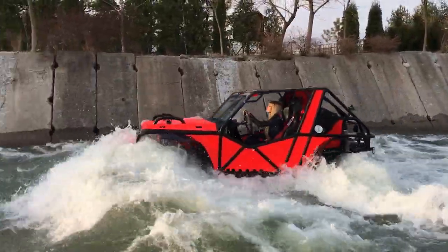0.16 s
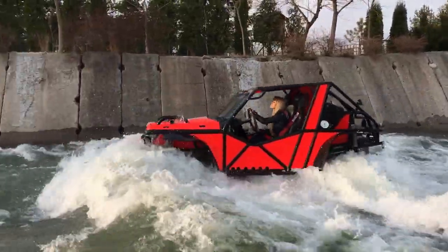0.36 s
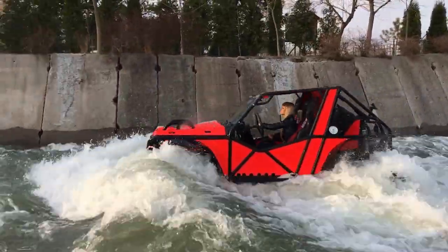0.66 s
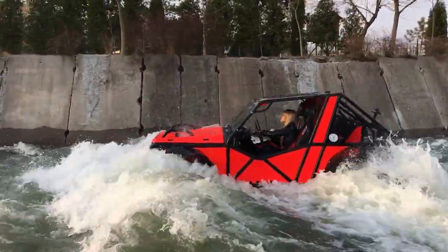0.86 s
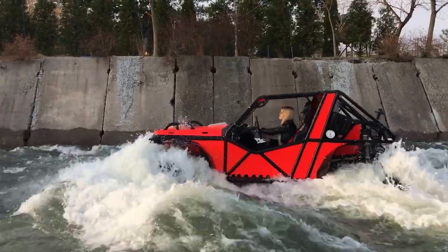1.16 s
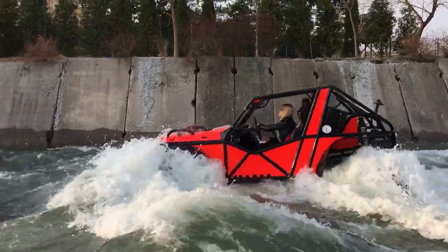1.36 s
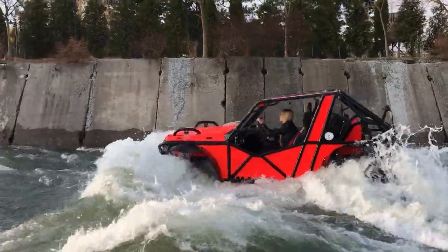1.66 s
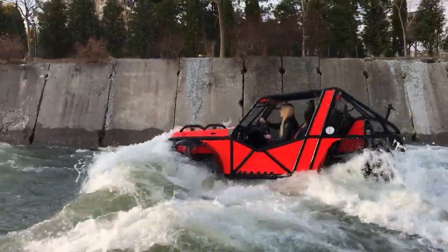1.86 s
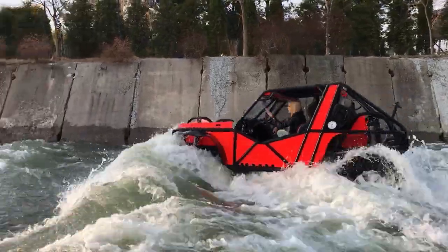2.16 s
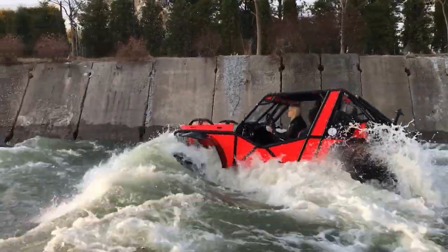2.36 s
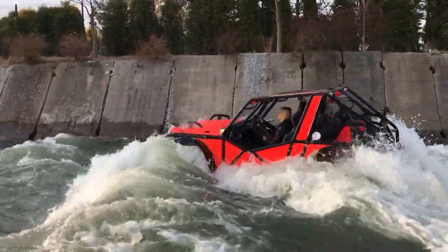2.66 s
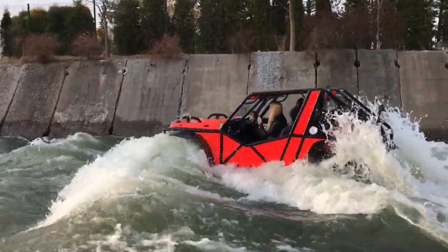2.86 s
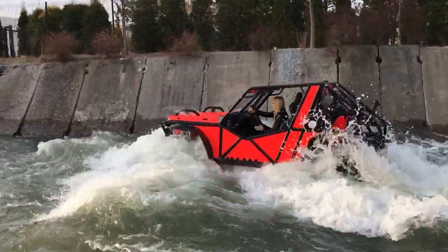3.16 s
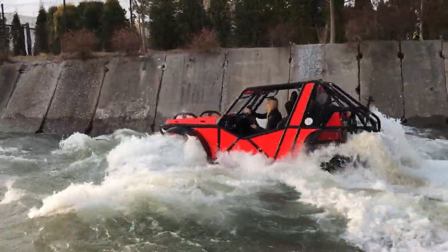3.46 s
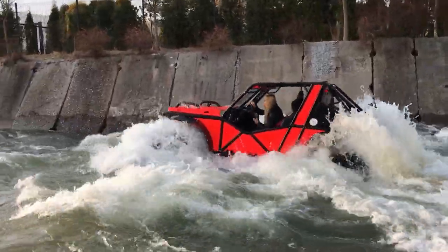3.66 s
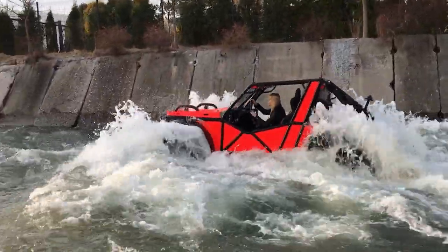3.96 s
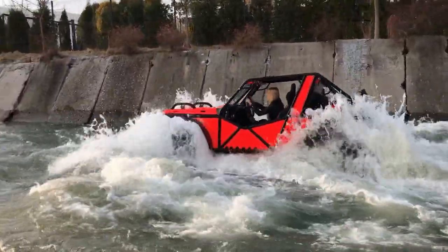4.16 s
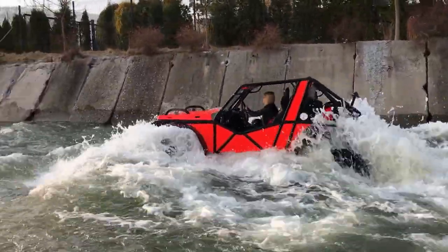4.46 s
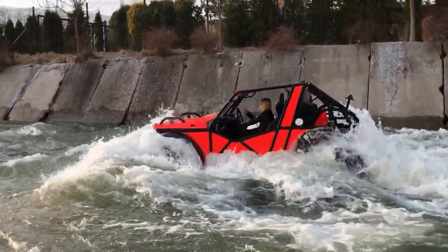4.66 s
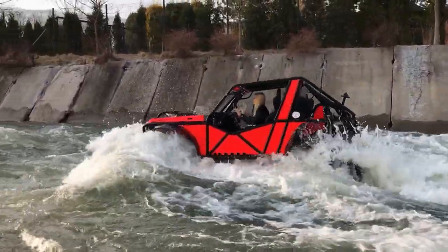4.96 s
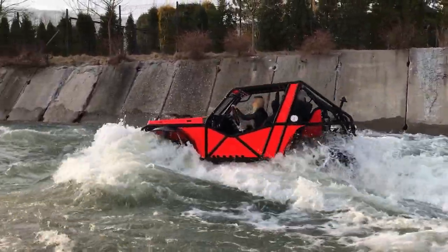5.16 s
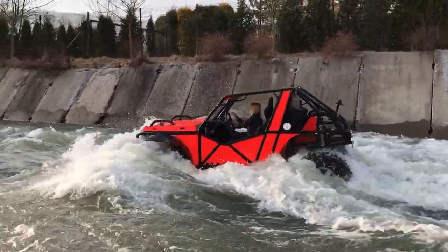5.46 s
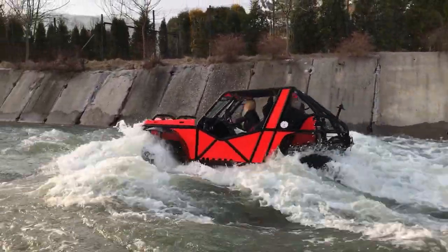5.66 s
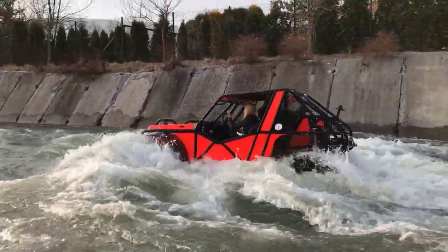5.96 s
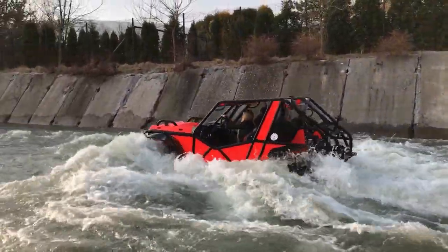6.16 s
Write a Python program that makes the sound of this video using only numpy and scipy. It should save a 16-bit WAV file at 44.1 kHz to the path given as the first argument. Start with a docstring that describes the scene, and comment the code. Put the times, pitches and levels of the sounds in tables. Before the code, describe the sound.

A V8 off-road buggy sits in fast, churning water, its lumpy exhaust burbling low. It revs early, again just after two seconds, and hardest between three and four, then falls back to a throbbing tick-over near five. Continuous river rush with fizzing droplets and bubbles surrounds it, and quick splashes slap nearby. Heard outdoors from the bank through a phone-like microphone with thin deep bass.

```python
"""A cross-plane V8 buggy revs beside a river rushing down a concrete channel, heard from the bank.
From the start the engine ticks over, its uneven exhaust bank made of cycle orders (cosines at multiples of the
cycle rate) and pulsed noise; the river is bands of noise with droplets and ringing bubbles.
The engine surges at about 0.4 s, 2 s and, highest, 3 to 4 s, then sinks to tick-over near 5 s.
From 0.6 s a few nearer splashes slap, each a short rising tone with a burst of noise."""
import sys
import numpy as np
from scipy import signal
from scipy.io import wavfile
from scipy.ndimage import uniform_filter1d

SR = 44100
rng = np.random.default_rng(int(sys.argv[2]) if len(sys.argv) > 2 else 0)


def materialize(psi):
    """Save the field psi as 16-bit PCM at rate SR to the path in sys.argv[1].

    A 1-D psi becomes a single channel; in a 2-D psi each row is a channel.
    """
    bounded = np.clip(np.atleast_2d(psi).T, -1, 1)
    quanta = np.round(bounded * 32767).astype(np.int16)
    wavfile.write(sys.argv[1], SR, quanta)


N = 278712
T = np.arange(N) / SR  # time in s


def undb(db):
    """Turn decibels into gain."""
    return 10 ** (np.asarray(db) / 20)


def unit(x):
    """Scale to rms 1."""
    return x / np.sqrt(np.mean(x ** 2))


def curves(table):
    """Join each column of a table by straight lines in time."""
    s, *columns = np.transpose(table)
    return [np.interp(T, s, c) for c in columns]


def colour_db(points, hz):
    """Read a spectrum's level, with pitch on a log scale."""
    f, db = np.transpose(points)
    return np.interp(np.log(hz), np.log(f), db)


def band(x, hz, width):
    """Two-pole resonance, gain 1 at the centre."""
    b, a = signal.iirpeak(min(hz, .45 * SR), hz / width, fs=SR)
    return signal.lfilter(b, a, x)


def walk(rate):
    """Random levels held 1 / rate seconds, then smoothed twice into a slow wander; spread near 1."""
    k = int(SR / rate)
    steps = np.repeat(rng.standard_normal(N // k + 1), k)
    return 1.11 * uniform_filter1d(uniform_filter1d(steps, k), k)[:N]


# How fast the engine turns; one cycle is two crank turns: start_s, cycle_rate_hz
SPEED = [(0, 15.0), (.16, 15.1), (.32, 14.1), (.4, 14.85), (.64, 21.07), (.72, 22.0), (.84, 22.45),
         (.96, 21.8), (1.12, 18.94), (1.2, 18.0), (1.36, 16.65), (1.56, 15.95), (1.84, 15.45), (2.0, 15.95),
         (2.08, 15.87), (2.4, 23.46), (2.56, 23.85), (2.72, 22.7), (2.8, 21.2), (3.04, 18.63),
         (3.12, 19.24), (3.44, 25.54), (3.6, 26.8), (3.68, 26.97), (3.84, 29.44), (3.95, 29.75),
         (4.08, 28.33), (4.16, 23.7), (4.27, 21.3), (4.4, 20.82), (4.56, 21.2), (4.72, 21.28), (4.81, 20.0),
         (4.95, 14.5), (5.04, 15.75), (5.14, 15.75), (5.28, 16.6), (5.44, 16.48), (5.7, 15.42),
         (5.77, 15.55), (5.86, 16.55), (6.16, 15.35), (6.32, 15.3)]


def turning():
    """Cycles turned so far, and how hard the engine pulls, from how fast its speed rises."""
    full_pull_hz_per_s, smoothing_s = 33.2, 0.078
    hz, = curves(SPEED)
    rise = uniform_filter1d(np.gradient(hz) * SR, int(smoothing_s * SR))
    return hz, np.cumsum(hz) / SR, np.clip(rise / full_pull_hz_per_s, -.5, 1)


def firing_strength(cycle):
    """A random strength for each of the 8 firings in a cycle, sliding from one to the next."""
    chance = rng.standard_normal(N // 100)
    return np.interp(8 * cycle, np.arange(len(chance)), chance)


# The uneven firing pattern of one exhaust bank: firing_slot (of 8), strength (relative)
BANK = [(0, 1), (3, .8), (5, .9), (6, .7)]


def order(k, cycle):
    """A cosine k times per cycle, its phase set by the bank's firing pattern."""
    slots, sizes = np.transpose(BANK)
    lead = np.angle(sizes @ np.exp(-2j * np.pi * k * slots / 8))
    lag = np.radians(90)  # a quarter-cycle phase lag on every order, which shapes the exhaust pulses
    return np.sqrt(2) * np.cos(2 * np.pi * k * cycle + lead - lag)


# Orders beside the drone and firing tone: the thump under load and two overtones of the lope:
# start_s, order_3_level_db, order_10_level_db, order_13_level_db
SIDE_ORDERS = [(0, -49, -28, -44), (.22, -46, -31.5, -40), (.33, -40, -28, -29), (.41, -26, -23, -30),
               (.56, -20, -23.5, -25), (.66, -22, -25.5, -32), (.88, -27, -42, -33.5), (.97, -47, -41, -46),
               (1.12, -38, -29, -50), (1.32, -44, -28.5, -27), (1.5, -41, -33, -34.5),
               (1.7, -48, -30, -37.5), (2.06, -36, -26, -28), (2.17, -23, -27.5, -30.5),
               (2.33, -20, -25, -28.5), (2.5, -25, -25, -42), (2.66, -23, -23, -52),
               (2.78, -46, -33.5, -48), (2.88, -26, -34, -39), (2.96, -36, -35, -54),
               (3.06, -29, -25.5, -37.5), (3.2, -27, -32, -25.5), (3.29, -24, -32, -35),
               (3.37, -21, -55, -56), (3.56, -23.5, -48, -30.5), (3.7, -24.5, -34, -46),
               (3.85, -20, -52, -35.5), (3.92, -38, -53, -53), (4.0, -26.5, -57, -51),
               (4.17, -22, -50, -41), (4.3, -28, -50, -40), (4.5, -39, -33, -52), (4.68, -30, -37, -41),
               (4.8, -44, -27.5, -42), (4.88, -21.5, -38, -52), (4.97, -40, -33, -45),
               (5.2, -37, -40.5, -47), (5.5, -45, -26, -37), (5.75, -44, -33.5, -44),
               (5.9, -45, -32, -32.5), (6.22, -46, -24.5, -36), (6.32, -39, -38, -34)]


def main_tones(cycle, drone, firing):
    """The drone (order 5), the firing tone (order 8) and three side orders, each at its own level."""
    tones = undb(drone) * order(5, cycle) + undb(firing) * order(8, cycle)
    for k, db in zip([3, 10, 13], curves(SIDE_ORDERS)):
        tones = tones + undb(db) * order(k, cycle)
    return tones


def layer_db(settings, load):
    """A layer's level follows drone, throttle and pull, and wanders a little."""
    rest_db, share, throttle_db, pull_db, wander_db = settings
    drone, throttle, pull = load
    tick_over_drone_db = -18.5
    level = rest_db + share * (drone - tick_over_drone_db)
    return level + throttle_db * throttle + pull_db * pull + wander_db * walk(10)


# How the exhaust pipe colours the orders: pitch_hz, level_db
PIPE = [(40, -22), (70, -16), (150, -1), (230, -3.5), (300, -18.5), (355, 2.5), (400, 0.5), (450, 2.5),
        (500, -3), (600, -5), (800, -33)]


def pipe_orders(orders, dbs, hz, cycle):
    """Orders grow and fade as they glide through the pipe's response."""
    return sum(undb(db + colour_db(PIPE, k * hz)) * order(k, cycle) for k, db in zip(orders, dbs))


# Unequal cylinders fill in the orders between: order (multiple of the cycle rate)
LOPE_ORDERS = [2, 4, 6, 7, 9, 11, 12]
# One for each lope order: level_db (before pipe and layer level)
LOPE_DB = [18, -13, -4.5, 3, 0.5, 0, -2.5]
# One row: rest_level_db, drone_share (dB per dB), throttle_db (at full), pull_db (at full), wander_db
LOPE = (-39, 0.83, 6, 8.5, 3)


def lope(hz, cycle, load):
    """The uneven throb of unequal cylinders, shaped by the pipe."""
    return undb(layer_db(LOPE, load)) * pipe_orders(LOPE_ORDERS, LOPE_DB, hz, cycle)


# The higher orders that bark: order (multiple of the cycle rate)
BARK_ORDERS = [14, 15, 16, 17, 18, 19, 20, 21, 22, 23, 24, 25, 26, 27, 28, 29]
# One for each bark order: level_db (relative, before the pipe)
BARK_DB = [-14, -14, 0, -13, 0, -7, -10, 0, -12, -4, -6, -10, -4, -12, -8, -7]
# One row: rest_level_db, drone_share (dB per dB), throttle_db (at full), pull_db (at full), wander_db
BARK = (-45.5, 0.7, 19, 3, 2.5)


def bark(hz, cycle, load):
    """High orders that bunch into a short crack on each of the strongest firings."""
    sharpness, floor = 7., .35  # how short each crack is, what sounds between
    crack = floor
    for at, size in BANK:
        crack = crack + size ** 5 * np.exp(sharpness * (np.cos(2 * np.pi * (8 * cycle - at) / 8) - 1))
    return undb(layer_db(BARK, load)) * unit(crack * pipe_orders(BARK_ORDERS, BARK_DB, hz, cycle))


PUFF_SCATTER_DB = 1.5  # how much the gas noise varies with firing strength

# Where the bubbling gas resonates: pitch_hz, width_hz (of the narrower of two resonances), level_db (relative)
BURBLE = [(60.7, 14, 0), (112, 110, 1.5), (160, 26, -4)]
# One row: rest_level_db, drone_share (dB per dB), throttle_db (at full), pull_db (at full), wander_db
GAS = (-31, 0.13, 5, 3, 2.5)


def burble(cycle, strength, load, puff=.42):
    """Gas burbles through the water: a fading puff of noise each firing (puff in slots) rings low resonances."""
    puffs = np.exp(-(8 * cycle % 1) / puff) * undb(PUFF_SCATTER_DB * strength)
    gas = puffs * rng.standard_normal(N)
    gas = sum(undb(db) * band(band(gas, f, w), f, 2 * w) for f, w, db in BURBLE)
    return undb(layer_db(GAS, load)) * unit(gas)


# One row: rest_level_db, drone_share (dB per dB), throttle_db (at full), pull_db (at full), wander_db
RASP = (-56, 0.8, 18, 4, 3)


def rasp(cycle, strength, load, pitch_hz=530., width_hz=300., jet=.5):
    """A jet of gas rasps at the pipe mouth after each firing of the near bank (jet length in slots)."""
    jets = sum(size ** 4 * np.exp(-((8 * cycle - at) % 8) / jet) for at, size in BANK)
    noise = jets * undb(PUFF_SCATTER_DB * strength) * rng.standard_normal(N)
    noise = band(band(noise, pitch_hz, width_hz), pitch_hz, 2 * width_hz)
    return undb(layer_db(RASP, load)) * unit(noise)


# Exhaust through time: start_s, drone_level_db (order 5), firing_tone_level_db (order 8), throttle (0-1)
EXHAUST = [(0, -17.5, -41, 0), (.24, -20.5, -32, 0), (.36, -18, -23, 0.75), (.48, -15, -21.5, 0.35),
           (.56, -21, -18, 0.8), (.64, -21, -15, 0.88), (.74, -22, -21, 0.92), (.9, -24.5, -21, 0.9),
           (.97, -28.5, -22, 0.88), (1.18, -29, -22, 0.13), (1.3, -21.5, -24.5, 0.7),
           (1.5, -19.5, -28.5, 0), (1.7, -19.5, -34, .25), (2.0, -21, -31, 0.23), (2.14, -18, -24.5, 0.2),
           (2.32, -18, -17, 0.86), (2.5, -18.5, -19.5, 0.71), (2.65, -19, -21, 0.67),
           (2.7, -23.5, -23.5, 0.3), (2.78, -29.5, -34, 0.5), (2.96, -27.5, -33.5, 0.4),
           (3.05, -20.5, -22, 0.2), (3.2, -15.5, -11.5, 0.5), (3.3, -21.5, -23.5, 0.4),
           (3.5, -26.5, -24, 0.95), (3.6, -16.5, -22, 0.69), (3.78, -21.5, -32.5, 0.04),
           (4.02, -25.5, -34, 0.1), (4.08, -34.5, -36, 0.5), (4.2, -28.5, -30.5, 0.3),
           (4.3, -24, -26.5, 0.52), (4.56, -21, -30.5, 0.64), (4.64, -26, -31, 0.6),
           (4.74, -20.5, -21, 0.7), (4.83, -21.5, -25.5, .3), (4.89, -35, -47, 0), (4.96, -23, -23, 0.85),
           (5.05, -17.5, -24.5, 0.44), (5.35, -23, -30, 0.42), (5.72, -21, -31, 0.1),
           (5.9, -25.5, -29, 0.3), (6.12, -21.5, -27.5, .1), (6.25, -29.5, -45, 0.6), (6.32, -26, -42, 0.8)]


def engine():
    """Orders of the firing cycle, each firing a little different, with gas burbling and rasping."""
    drone, firing, throttle = curves(EXHAUST)
    hz, cycle, pull = turning()
    strength = firing_strength(cycle)
    load = drone, throttle, pull
    main = main_tones(cycle, drone, firing)
    # above the dip in the pipe's response the orders turn over, hence the minus
    upper = lope(hz, cycle, load) - bark(hz, cycle, load) + rasp(cycle, strength, load)
    main_scatter_db, upper_scatter_db = 1.1, 1.3
    tones = undb(main_scatter_db * strength) * main + undb(upper_scatter_db * strength) * upper
    return tones + burble(cycle, strength, load)


def bubbles(cycles=8.2, tilt_db=-3.0):
    """Air pockets in the white water each ring briefly at their own pitch; small high ones are fainter."""
    out = 0
    rate, size_db = 900, 2.5  # pops per s over all pitches, spread of sizes
    pitches = 800 * 2 ** np.arange(0, 3, 1 / 9)
    for hz in pitches:
        pop = rng.random(N) < rate / len(pitches) / SR
        pop = pop * undb(size_db * rng.exponential(size=N))
        ring = band(band(pop, hz, 2 * hz / cycles), hz, hz / cycles)
        out = out + undb(tilt_db * np.log2(hz / 1000)) * unit(ring)  # tilt in dB per octave
    return unit(out)


def droplets(rate=810.0, size_db=2.5):
    """Clicks at random times (rate per s), up or down, with a spread of droplet sizes."""
    hits = rng.random(N) < rate / SR
    return unit(hits * undb(size_db * rng.exponential(size=N)) * rng.choice([-1, 1], N))


# The river through time: start_s, white_water_level_db, spray_treble_db
RIVER = [(0, -28.5, 0), (.15, -29, -0.5), (.5, -31, .5), (.58, -30, -1.5), (.68, -33, -1),
         (1.72, -29.5, -0.5), (2.4, -31.5, -1), (2.57, -34.5, 0.5), (3.05, -29.5, -2), (3.22, -33, -0.5),
         (3.55, -33, -0.5), (3.66, -34.5, -1), (3.93, -32.5, -2), (4.14, -32.5, 1.5), (4.7, -31, 1),
         (5.17, -33, -1.5), (5.33, -32, 0), (6.32, -32, -0.5)]
# The colour of the churning water: pitch_hz, level_db (per Hz, relative)
WATER = [(150, -32), (250, -1.5), (318, -9.5), (647, -8.5), (743, -14.5), (1090, -7), (2130, -16.5),
         (3280, -15), (4970, -21.5), (6670, -23), (7660, -26), (8640, -19.5), (10300, -24.5),
         (12200, -25.5), (15600, -27)]


def river(swell_db=0.17, flicker_db=0.72, spray_flicker_db=0.56, bubble_db=-10.5, fizz_share=0.077):
    """Third-octave bands of churning water heave together and flicker alone, with droplets and bubbles."""
    roar, spray = curves(RIVER)
    swell, gust, out = walk(9), walk(12), 0
    drops = droplets()
    for hz in 200 * 2 ** np.arange(0, 6.5, 1 / 3):
        water = rng.standard_normal(N) + fizz_share * drops
        water = band(band(water, hz, hz / 3), hz, hz / 3)
        # the spray level reaches mainly the bands above about 4.5 kHz
        share = 1 / (1 + (4500 / hz) ** 4)
        db = colour_db(WATER, hz) + share * (spray + spray_flicker_db * gust)
        db = db + swell_db * swell + flicker_db * walk(14)
        out = out + undb(db) * water
    return undb(roar) * (unit(out) + undb(bubble_db) * bubbles())


# Nearer slaps of water: start_s, peak_level_db (before the microphone), pitch_hz (at the start)
SPLASH = [(0.586, -24, 1250), (1.546, -20.5, 1750), (1.731, -19, 1910), (2.331, -27, 940),
          (2.37, -25, 1310), (2.502, -20.5, 990), (2.756, -25, 955), (3.02, -19, 830), (3.503, -23, 1340),
          (3.543, -23, 1300), (3.915, -21.5, 940), (4.037, -26, 972), (5.573, -27, 1080),
          (6.248, -27, 1570)]


def splashes(rise_per_s=4.6):
    """Slaps of water: a short burst of noise round a pitch that glides up."""
    length, t60_s, attack_s = 4096, .031, .0011  # samples, time to fade 60 dB, onset
    out = np.zeros(N + length)
    t = np.arange(length) / SR
    fade = np.exp(-np.log(1000) * t / t60_s) * (1 - np.exp(-t / attack_s))
    for s, db, hz in SPLASH:
        # t squared makes the pitch climb by 2 * rise_per_s of its start value each second
        tone = np.sin(2 * np.pi * hz * (t + rise_per_s * t ** 2))
        hiss = unit(band(rng.standard_normal(length), 1.15 * hz, .8 * hz))
        burst = fade * (tone + .85 * hiss)
        start = int(s * SR)
        out[start:start + length] += undb(db) * burst / np.abs(burst).max()
    return out[:N]


def scene():
    """Engine, river and splashes at the bank."""
    return (engine() + river() + splashes())[None]


# Dips from the microphone's case: pitch_hz, width_hz, depth (0-1)
MIC_DIPS = [(4990, 120, 0.55), (7760, 860, 0.39), (10360, 910, 0.52)]


def record(dry):
    """A phone microphone: thin bass, dips from its case, a steep top."""
    bass_hz, top_hz = 40, 15760
    x = signal.sosfilt(signal.butter(4, bass_hz, "high", fs=SR, output="sos"), dry)
    for hz, width, depth in MIC_DIPS:
        x = x - np.clip(depth, 0, 1) * band(x, hz, width)
    return signal.sosfilt(signal.ellip(14, .3, 65, top_hz, fs=SR, output="sos"), x)


dry = scene()
out = record(dry)
materialize(out)
```